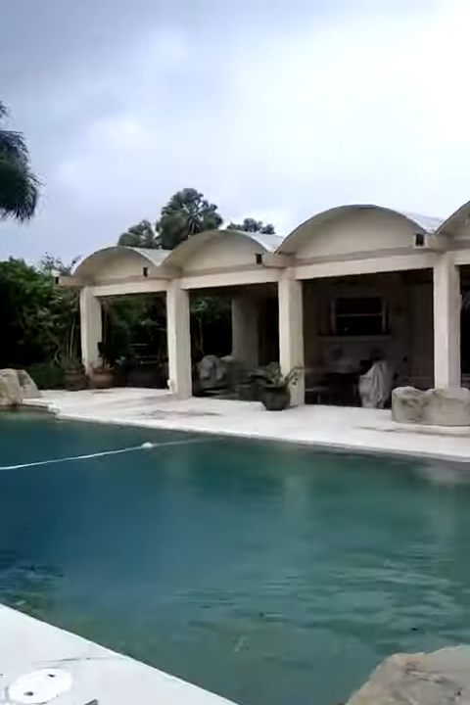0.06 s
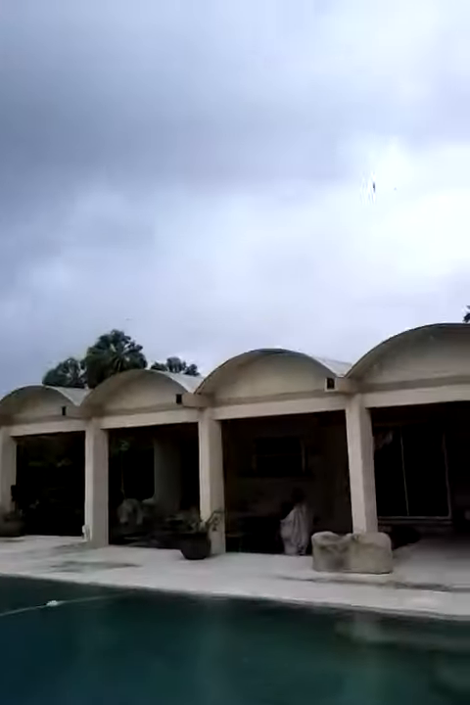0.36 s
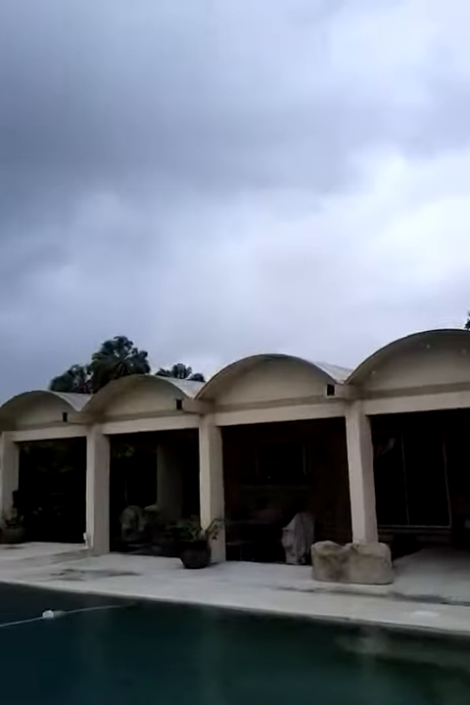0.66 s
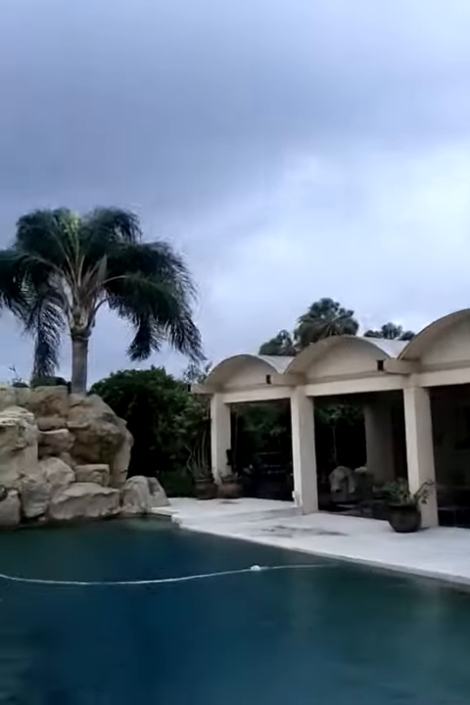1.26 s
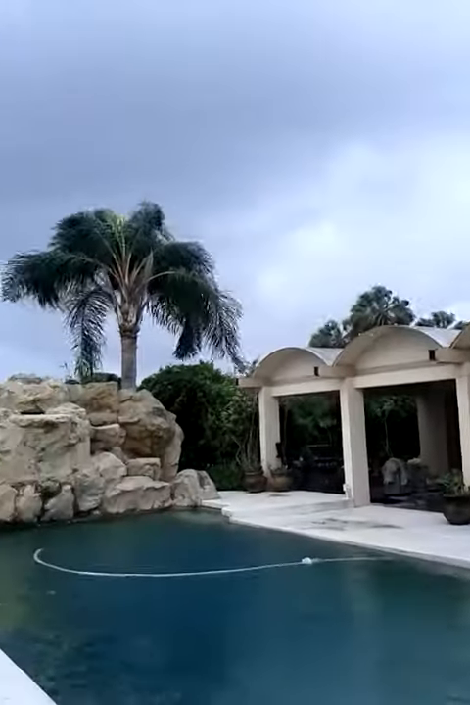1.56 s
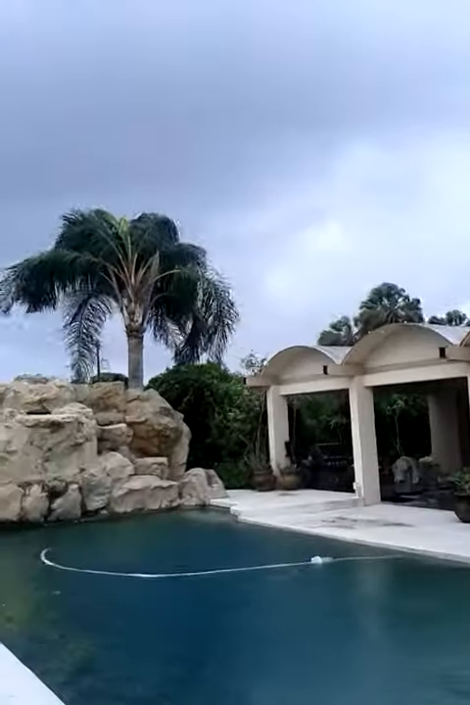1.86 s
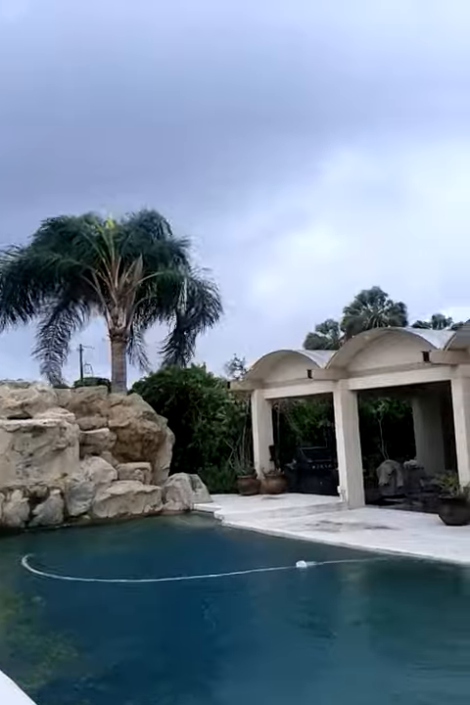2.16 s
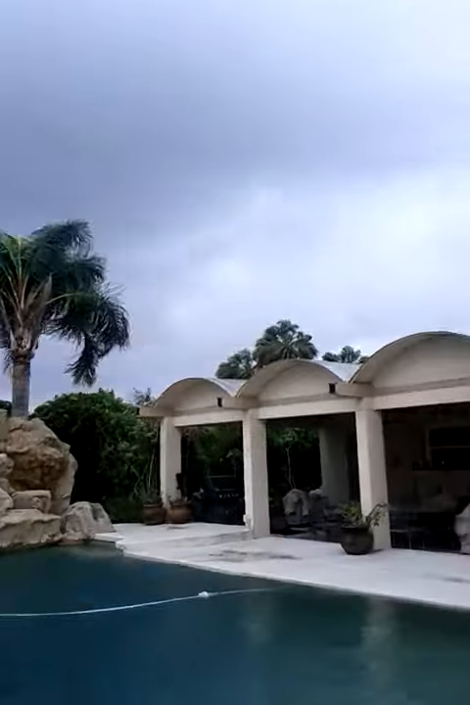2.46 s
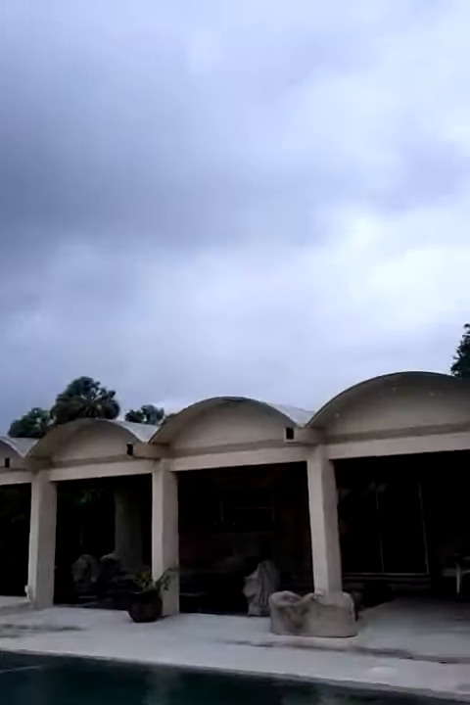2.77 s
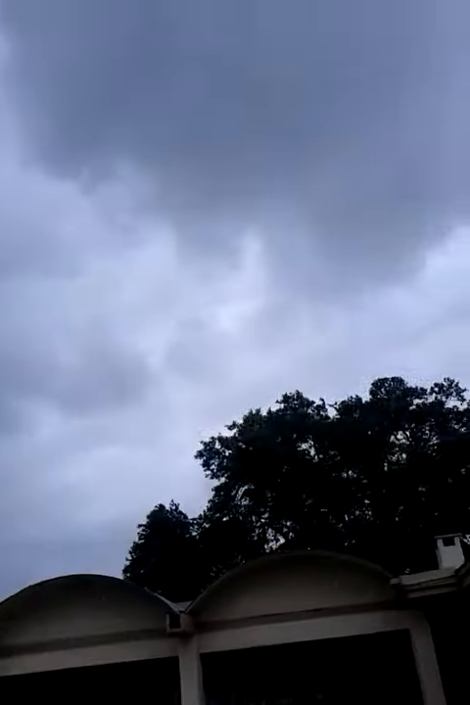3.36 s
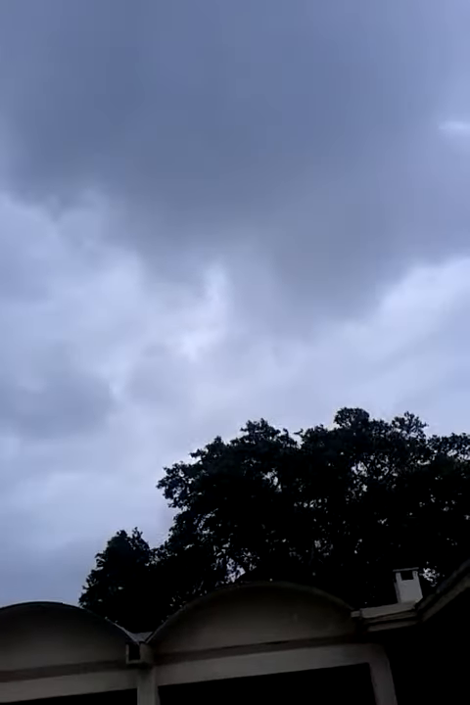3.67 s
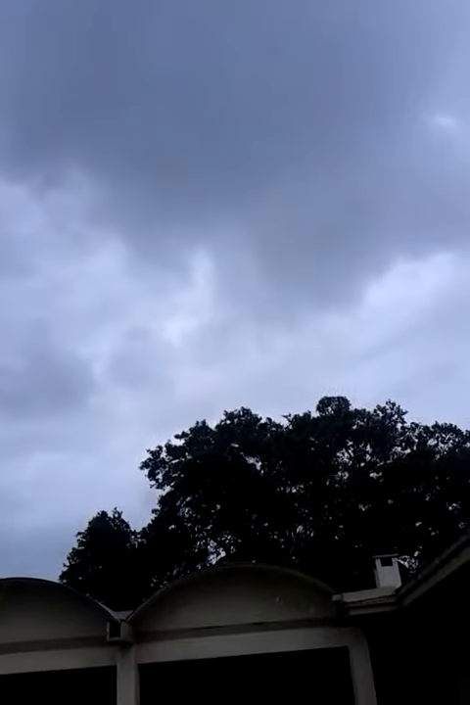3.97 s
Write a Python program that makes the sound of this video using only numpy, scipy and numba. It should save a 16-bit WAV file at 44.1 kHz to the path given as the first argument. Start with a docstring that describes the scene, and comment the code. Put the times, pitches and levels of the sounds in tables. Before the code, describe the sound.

Gusty wind hits the microphone beside a garden pool, rumbling and rasping near the start and again near the end, with brief low thumps between. Rustling leaves and a far roar of trees continue throughout.

```python
"""Storm wind buffets a microphone: two strong gusts and a string of short eddies.
The harder the air hits, the brighter its turbulence rumbles. Behind it, palms and garden trees
beside a pool give a steady wash of leaves over a far roar. The strongest blasts overload
the microphone, which rasps and briefly chokes the hiss."""
import sys
import numpy as np
from scipy import signal
from scipy.fft import rfft, irfft
from scipy.io import wavfile
from scipy.ndimage import uniform_filter1d
from numba import njit

SR = 44100
rng = np.random.default_rng(int(sys.argv[2]) if len(sys.argv) > 2 else 0)


def dump(signal):
    """Clip the signal to [-1, 1] and save it as 16-bit WAV at the path in sys.argv[1]."""
    limited = np.clip(np.atleast_2d(signal).T, -1, 1)
    pcm = np.round(limited * 32767).astype(np.int16)
    wavfile.write(sys.argv[1], SR, pcm)


N = 176400
TIME = np.arange(N) / SR
BIN_HZ = np.maximum(np.arange(N // 2 + 1) * SR / N, 1)  # floored at 1 Hz for logarithms

# wind pressure on the microphone (time [s], level [dB])
GUST_PRESSURE = [(0, -9.5), (.04, -38), (.09, -44), (.25, -42), (.29, -26), (.365, -52), (.382, -21),
                 (.44, -15), (.48, -20), (.51, -16), (.565, -4), (.60, -23.5), (.655, -17), (.69, -28),
                 (.73, -42), (.80, -33), (1.0, -31.5), (1.12, -27), (1.19, -48), (1.39, -30.5),
                 (1.52, -48.5), (1.67, -34.5), (1.85, -46), (2.14, -39), (2.185, -24), (2.24, -27.5),
                 (2.29, -37), (2.41, -29.5), (2.68, -32), (2.79, -30), (3.04, -28.5), (3.11, -32),
                 (3.29, -38), (3.355, -20), (3.40, -29), (3.47, -20), (3.62, -13), (3.70, -20),
                 (3.745, -20.5), (3.775, -26), (3.87, -34.5), (4.0, -32)]
# turbulence before its treble rolls off (frequency [Hz], spectral level [dB])
TURBULENCE_SPECTRUM = [(20, -6.5), (45, -3.5), (80, 3.5), (140, 0.5), (240, 4), (350, 1), (600, -0.5),
                       (1200, -6.5), (2500, -10), (7000, -22.5)]
# slow push on the diaphragm (frequency [Hz], spectral level [dB])
HEAVE_SPECTRUM = [(12, -6.5), (30, 2), (60, -2), (100, -6), (180, -17.5), (400, -48)]
def buffeting():
    """Turbulent pressure on a diaphragm makes a rumble whose bandwidth rises with the pressure."""
    flutter_db, heave_db = 3.4, 5.5
    gust_db = curve(GUST_PRESSURE)
    pressure_db = gust_db + flutter_db * fluctuation(rate_hz=70)
    cutoff_hz = np.minimum(432 * 2 ** ((pressure_db + 18) / 10.5), 674)  # an octave per 10.5 dB
    rumble = lowpass(colour(rng.standard_normal(N), TURBULENCE_SPECTRUM), cutoff_hz, damping=1.62)
    rumble /= np.sqrt(uniform_filter1d(rumble ** 2, size=900))  # pressure alone sets the level
    heave = colour(rng.standard_normal(N), HEAVE_SPECTRUM)
    heave_gain = undb(heave_db + 1.44 * gust_db)  # grows faster than the rumble
    return undb(pressure_db + 0.56) * rumble + heave_gain * heave


# eddies that strike the microphone (time [s], half-width [s], level [dB], centre frequency [Hz])
EDDY_STRIKES = [(0.063, 0.0033, -13, 141), (0.382, 0.0099, -18, 220), (.436, 0.017, -15, 400),
                (0.492, 0.0079, -15.5, 447), (0.544, 0.018, -9, 505), (0.556, 0.0045, -8.5, 650),
                (0.575, 0.0022, -0.5, 750), (0.641, 0.012, -14, 330), (0.772, 0.0045, -18.5, 131),
                (0.835, 0.0064, -15.5, 270), (0.901, .008, -24, 220), (0.941, 0.0078, -25, 220),
                (2.39, 0.0087, -18, 407), (2.411, .010, -18, 170), (2.449, 0.0057, -14.5, 347),
                (2.471, 0.013, -15.5, 225), (2.53, .012, -17.5, 324), (2.572, 0.0042, -15, 170),
                (2.595, 0.0065, -15.5, 161), (2.654, 0.016, -14.5, 298), (2.668, 0.029, -15, 95),
                (2.727, 0.0081, -19, 253), (2.849, 0.0089, -8, 304), (2.949, 0.012, -14.5, 239),
                (3.056, .018, -17.5, 370), (3.369, .007, -19.5, 180), (3.525, 0.015, -14, 260),
                (3.557, 0.0084, -15, 460), (3.62, .007, -6, 664), (3.681, 0.021, -8.5, 550),
                (3.729, 0.024, -14, 384)]
def eddies():
    """A passing eddy is a pressure transient: a few swings under a Gaussian envelope, heard as a thump."""
    out = np.zeros(N)
    for at, half_width, db, centre_hz in EDDY_STRIKES:
        envelope = np.exp(-2 * ((TIME - at) / half_width) ** 2)
        band = np.exp(-.5 * np.log2(BIN_HZ / centre_hz) ** 2)  # spread of one octave
        top_hz = 1.62 * centre_hz
        band /= np.sqrt(BIN_HZ * (1 + (BIN_HZ / top_hz) ** 10))  # pink tilt, steep fall above top_hz
        swings = envelope * irfft(rfft(rng.standard_normal(N)) * band, N)
        out += undb(db) * swings * np.sqrt(np.sum(envelope ** 2) / np.sum(swings ** 2))
    return out


# hiss of fronds and leaves (frequency [Hz], spectral level [dB])
LEAF_SPECTRUM = [(500, -18.5), (1500, 1.5), (2300, -3), (3050, -6), (3700, 2), (4300, -0.5), (5400, -1.5),
                 (6400, 1), (6850, -1.5), (7200, -8.5), (7600, -24)]
# swell of the leaves (time [s], level [dB])
LEAF_SWELL = [(0, -1), (.35, 0.2), (.65, -0.1), (1.2, 0), (2.2, 0.8), (3.2, 1), (4, 2.6)]
def leaves():
    """Airflow makes near fronds hiss, while leaf tips collide at random as a Poisson process."""
    hiss_db, ticks_db, ticks_per_s = -32.5, -38, 2500
    hiss = sway(colour(rng.standard_normal(N), LEAF_SPECTRUM), depth_db=0.05, rate_hz=11)
    impacts = (rng.random(N) < ticks_per_s / SR) * rng.standard_normal(N)
    ticks = colour(impacts, LEAF_SPECTRUM)
    swell = undb(curve(LEAF_SWELL) + 0.4 * fluctuation(rate_hz=20))
    return (undb(hiss_db) * hiss + undb(ticks_db) * ticks) * swell


# far roar of the trees (frequency [Hz], spectral level [dB])
ROAR_SPECTRUM = [(25, -13), (60, -3.5), (130, -4), (230, -4), (320, 2), (500, -2), (750, -2), (1100, 0),
                 (1500, -4.5), (2000, -6), (3000, -11), (7000, -32.5)]
def far_trees():
    """Flow noise from far crowns sums incoherently to a broad roar whose colour shifts slightly."""
    roar = colour(rng.standard_normal(N), ROAR_SPECTRUM)
    return undb(-31) * sway(roar, depth_db=-0.37, rate_hz=10)


def undb(db):
    """Amplitude grows tenfold per 20 dB."""
    return 10 ** (np.asarray(db) / 20)


def unit(x):
    """Normalisation to rms 1."""
    return x / np.sqrt(np.mean(x ** 2))


def curve(rows):
    """Linear interpolation between (time [s], value) points."""
    return np.interp(TIME, *np.array(rows).T)


def colour(x, points):
    """Spectral shaping by (frequency [Hz], level [dB]) points, at rms 1."""
    hz, db = np.array(points).T
    gain = undb(np.interp(np.log(BIN_HZ), np.log(hz), db))
    return unit(irfft(rfft(x) * gain, N))


def fluctuation(rate_hz):
    """Low-pass Gaussian noise: a smooth random drift at rms 1."""
    hz = np.arange(N // 2 + 1) * SR / N
    gain = (hz > 0) * np.exp(-(hz / rate_hz) ** 2)
    return unit(irfft(rfft(rng.standard_normal(N)) * gain, N))


def sway(x, depth_db, rate_hz, bands=12):
    """Random amplitude modulation of half-octave bands, each correlated with its neighbours."""
    position = np.clip(2 * np.log2(BIN_HZ / 160), 0, bands - 1)
    spectrum, out = rfft(x), 0
    drift_below = fluctuation(rate_hz)
    for k in range(bands):
        drift = fluctuation(rate_hz)
        band = irfft(spectrum * np.maximum(1 - np.abs(position - k), 0), N)
        out += band * undb(depth_db * (drift + drift_below) / np.sqrt(2))
        drift_below = drift
    return unit(out)


@njit
def lowpass(x, cutoff_hz, damping):
    """State-variable filter: two integrators in a loop form a low-pass with a moving cutoff."""
    low, band_state, low_state = np.empty(len(x)), 0., 0.
    for i in range(len(x)):
        g = np.tan(np.pi * cutoff_hz[i] / SR)
        band = (band_state + g * (x[i] - low_state)) / (1 + g * (g + damping))
        low[i] = low_state + g * band
        band_state, low_state = 2 * band - band_state, 2 * low[i] - low_state
    return low


def scene():
    """Superposition: the foliage and the wind on the microphone add in one channel."""
    return (far_trees() + leaves() + buffeting() + eddies())[None]


def record(dry):
    """Saturation flattens strong blasts and the hiss riding on them; filters then limit the bandwidth."""
    overload, ceiling, low_cut_hz, top_hz = 0.42, 0.7, 122.4, 7450
    x = dry / (1 + (dry / overload) ** 4) ** .25
    x = signal.sosfilt(signal.butter(2, low_cut_hz, "high", fs=SR, output="sos"), x)
    x = np.clip(x, -ceiling, ceiling)
    return signal.sosfilt(signal.ellip(10, .2, 62, top_hz, fs=SR, output="sos"), x)


dry = scene()
out = record(dry)
dump(out)
```